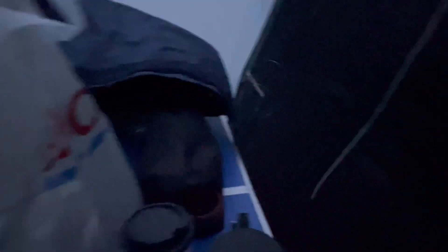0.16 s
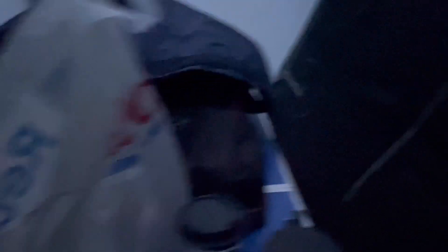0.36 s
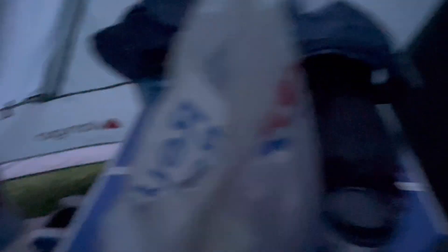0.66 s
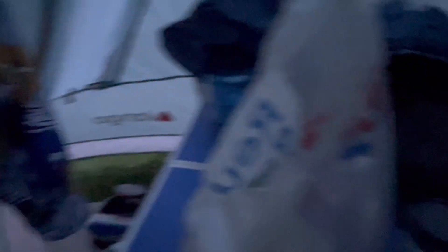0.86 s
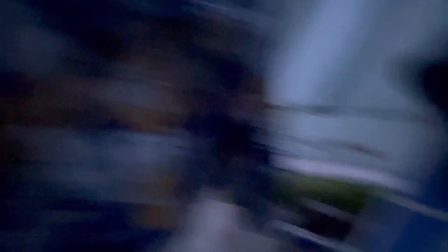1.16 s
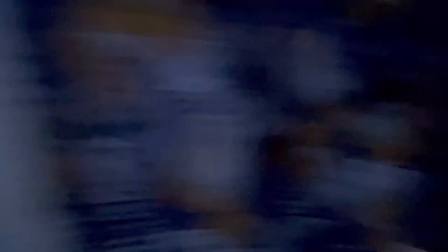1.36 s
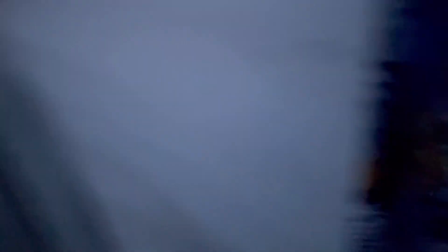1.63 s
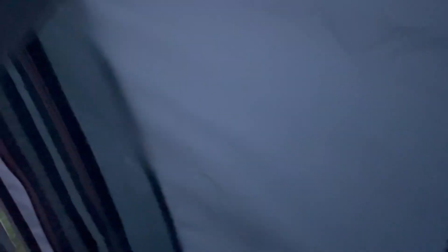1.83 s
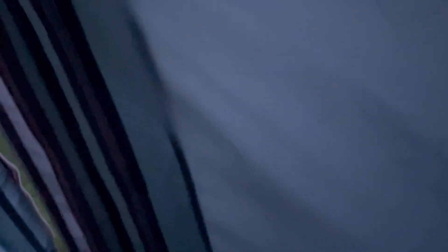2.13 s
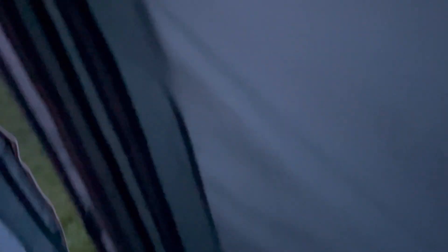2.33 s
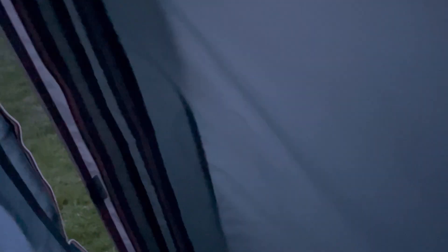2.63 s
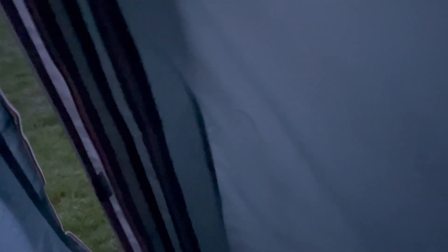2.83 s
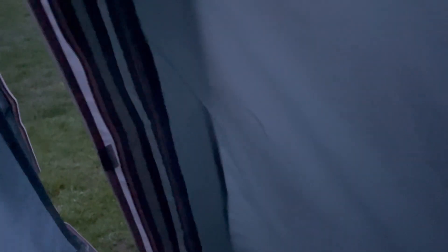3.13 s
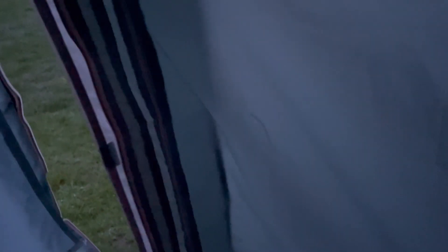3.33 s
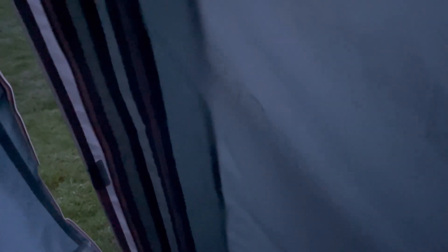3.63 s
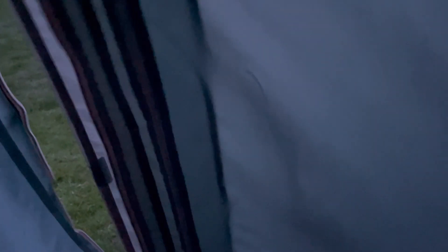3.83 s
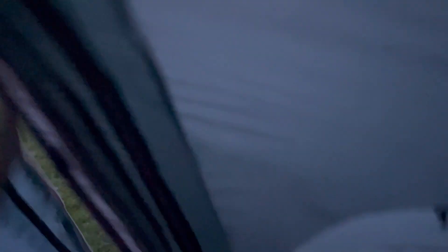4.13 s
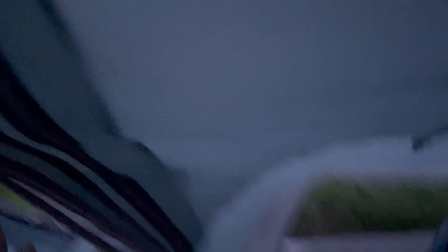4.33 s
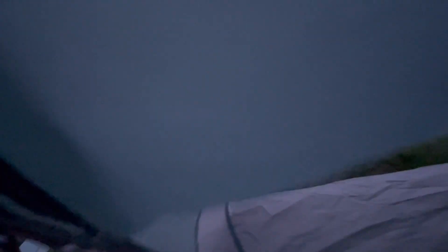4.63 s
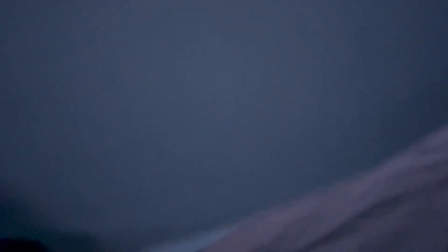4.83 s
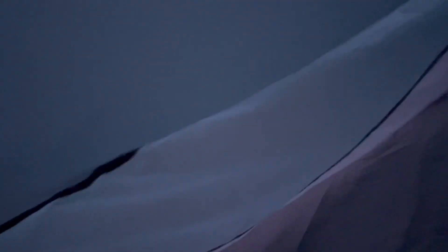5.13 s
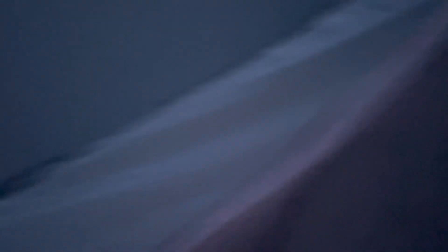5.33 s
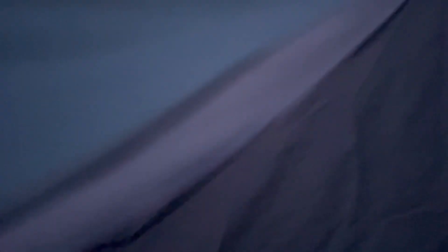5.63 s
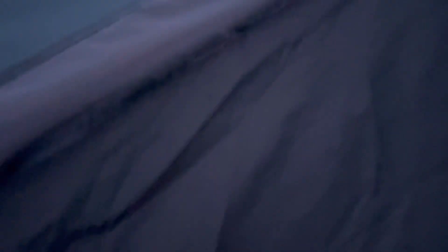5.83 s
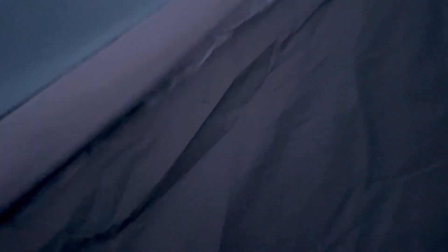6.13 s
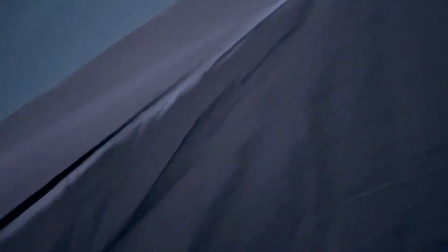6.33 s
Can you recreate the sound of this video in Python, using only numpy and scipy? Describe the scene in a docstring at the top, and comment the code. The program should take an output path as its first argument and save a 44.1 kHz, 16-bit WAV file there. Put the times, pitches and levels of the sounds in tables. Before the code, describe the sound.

Close, dry stereo inside a tent, with faint hand rumble and softly stirring cloth. At about 0.5 s a hard, hollow object lands with a loud double clack, its second blow heavier, then rocks with a weaker knock near 0.6 s. From 0.7 to 3 s nylon slides and rustles quietly with tiny snaps and brushes, settling almost to stillness. At 3.85 s a zip starts, rising quickly from a buzz to a fast rasp until 4.3 s, where the metal tab clinks and the taut panel shudders with a dull snap. A second fast stroke runs 4.36-4.83 s; a third slows into separate ticks by 5.15 s. Shorter, lower strokes follow at 5.25 and 5.55 s, slackening by 5.9 s. Loosened nylon swishes, crackles and thuds around them, with thin husky whistles, a small knock at 6.3 s and a last rising cloth squeak.

```python
"""Inside a tent something hard is set down with a double clack, and nylon rustles in a turn to the door.
The door zip is pulled in five strokes: a pulse per tooth buzzes in the cloth and rasps in the teeth.
The metal tab clinks and the door panel shudders; cloth, in bands of shaped noise, swishes, snaps and billows.
All is heard close to the two microphone ports of a hand-held camera, over the rumble of the hand."""
import sys
import numpy as np
from scipy import signal
from scipy.fft import rfft, irfft, next_fast_len
from scipy.io import wavfile
from scipy.ndimage import uniform_filter1d, map_coordinates

SR = 44100
rng = np.random.default_rng(int(sys.argv[2]) if len(sys.argv) > 2 else 0)


def to_wav(sig):
    """Store sig (one row per channel, or 1-D mono) as 16-bit WAV at the path in sys.argv[1].

    Samples outside -1..1 are clipped; the rate is SR.
    """
    pcm = np.clip(np.atleast_2d(sig), -1, 1) * 32767
    pcm = np.round(pcm).astype(np.int16)
    wavfile.write(sys.argv[1], SR, pcm.T)  # frames by channels


N = 285530  # samples

# five strokes of the hand, a list each: (time [s], slider speed [teeth/s], cloth buzz before gain [dB])
PULLS = [
    [(3.85, 193, -59), (3.866, 234, -34), (3.88, 236.2, -52), (3.884, 266, -39), (3.92, 346, -34),
     (3.93, 390, -28), (3.944, 535, -30.5), (3.95, 536, -31.5), (3.978, 457, -29.5), (3.982, 450, -25),
     (3.988, 486, -42), (4.0, 536, -33), (4.01, 710, -47), (4.018, 830, -42), (4.036, 670, -36.5),
     (4.066, 850, -49), (4.088, 810, -46), (4.094, 870, -52), (4.108, 840, -41), (4.118, 776.8, -44),
     (4.124, 822.7, -61), (4.138, 930, -37), (4.196, 770, -44), (4.216, 810, -44), (4.246, 707.7, -38),
     (4.27, 631.2, -29), (4.286, 557.1, -46), (4.3, 498.5, -40)],
    [(4.36, 397, -47), (4.372, 590, -35), (4.38, 657.5, -36), (4.398, 760, -38.5), (4.41, 633.0, -30),
     (4.414, 646, -28), (4.448, 600, -32), (4.456, 550, -33.5), (4.47, 670, -36.5), (4.484, 536, -32),
     (4.504, 650, -33), (4.526, 640, -37), (4.532, 605, -46), (4.54, 495, -35), (4.552, 530, -49),
     (4.56, 580, -38), (4.58, 484, -37), (4.61, 650, -37.5), (4.624, 670, -54), (4.66, 724, -55),
     (4.694, 610, -55), (4.726, 635, -46), (4.742, 525, -42), (4.766, 466, -46), (4.78, 510, -46),
     (4.8, 422.4, -39), (4.81, 405.8, -38), (4.835, 322.2, -36)],
    [(4.85, 510, -39), (4.865, 520, -48), (4.91, 360, -37), (4.98, 245, -42), (5.03, 265, -43),
     (5.15, 77, -79)],
    [(5.24, 200, -53), (5.28, 268, -44), (5.308, 415, -35.5), (5.345, 317, -36.5), (5.385, 380, -38),
     (5.396, 515, -37.5), (5.43, 502, -34), (5.465, 490, -37.5), (5.485, 440, -52)],
    [(5.55, 357, -48), (5.595, 387, -47.5), (5.615, 420, -39.5), (5.655, 392, -34.5), (5.675, 270, -41),
     (5.7, 475, -31), (5.735, 323, -35), (5.755, 207, -36.5), (5.78, 140, -49), (5.9, 56.5, -46)],
]
# cloth around the slider, response: (frequency [Hz], level [dB])
TAPE_SPECTRUM = [(100, -10.5), (230, 14), (400, 13), (650, 4.5), (950, -4.5), (1400, -9), (2200, -49),
                 (5000, -79)]
# teeth, response before the tilt of each stroke: (frequency [Hz], level [dB])
TEETH_SPECTRUM = [(500, -20), (800, -4), (1200, 5), (1650, 3.5), (2000, -3.5), (2550, 2.5), (3000, -2),
                  (3500, -2.5), (4300, -7), (5200, -9), (5800, -21), (7700, -13), (9000, -21), (11200, -10),
                  (12500, -24), (15500, -30)]
# tilt of the teeth's colour, one value per stroke: [dB/octave]
STROKE_TILTS_DB_PER_OCTAVE = [-1, -4, -7, -1, -5]
# scrape of the teeth: (frequency [Hz], level [dB per Hz])
GRIT_SPECTRUM = [(500, -18), (1200, -6), (2600, -8), (4500, 6), (7000, 3), (12000, -12)]
# how hard the teeth rasp at an easy pace: (time [s], level [dB])
RASP_LEVELS = [(3.85, -43), (3.95, -39.5), (4.03, -38.5), (4.07, -35), (4.16, -36), (4.24, -41.5),
               (4.35, -43), (4.43, -42), (4.49, -39), (4.56, -44), (4.66, -40.5), (4.8, -44), (4.9, -41),
               (5.15, -43), (5.24, -51), (5.48, -51), (5.7, -45)]
# pull tab strikes: (time [s], level [dB])
CLINKS = [(4.3014, -19.5), (4.3065, -17.5), (4.309, -21), (4.329, -22), (4.3317, -23)]
# pull tab colour: (frequency [Hz], level [dB per Hz])
TAB_SPECTRUM = [(1500, -22), (3000, 1), (4200, 6.5), (8000, 7.5), (11000, 6), (14000, -32)]
# shudder of the taut door panel: (time [s], fundamental [Hz], level [dB])
SHUDDER = [(4.2, 116.9, -64), (4.235, 113.8, -36), (4.27, 117.5, -32.5), (4.31, 114.3, -38.5),
           (4.34, 97.44, -35.5), (4.36, 80.1, -59)]
# nylon slides in the turn to the door, as it opens and as it falls aside, a list each:
# (time [s], swish before gain [dB], rustle before gain [dB])
SLIDES = [
    [(1.25, -76.5, -61), (1.42, -66, -56), (1.43, -55, -51), (1.55, -52.5, -51), (1.68, -64.5, -52.5),
     (2.06, -50, -52), (2.71, -65, -55), (3.01, -67.5, -61.5), (3.63, -75, -69)],
    [(3.72, -62, -63), (3.872, -55, -52), (3.946, -47, -42), (4.134, -43, -37.5), (4.288, -46, -40),
     (4.298, -47.5, -38.5), (4.5, -47.5, -48.5), (4.684, -44.5, -37), (4.79, -52, -49)],
    [(4.82, -36.5, -46), (4.828, -39, -40), (5.136, -42.5, -42.5), (5.33, -37, -46), (5.684, -40.5, -41.5),
     (5.77, -39, -36), (5.932, -50, -44), (6.166, -47.5, -50), (6.47, -42.5, -57)],
]
# a sleeve or the door brushes past: (time [s], Gaussian width [s], swish [dB], rustle [dB])
BRUSHES = [(.05, .05, -68, -84), (1.081, 0.022, -62, -50), (1.487, 0.0074, -42.5, -56),
           (2.306, 0.018, -43.5, -61), (2.433, 0.013, -61, -68), (2.565, 0.027, -52, -51),
           (3.405, 0.018, -58.5, -55), (3.681, 0.0099, -53, -73), (4.343, 0.0091, -41, -29.5),
           (4.866, 0.019, -34.5, -37), (5.333, 0.038, -39.5, -36), (5.977, 0.025, -56, -41)]
# bright slide of nylon: (frequency [Hz], level [dB per Hz])
SWISH_SPECTRUM = [(4000, -8.5), (7000, -3), (9000, -2), (11000, 1), (13000, -0.5), (14500, -3.5),
                  (16000, -7.5)]
# folds and creases: (frequency [Hz], level [dB per Hz])
RUSTLE_SPECTRUM = [(300, -22), (900, 7), (1600, 1.5), (3000, 1.5), (4800, -3), (5600, -8), (7000, -7),
                   (9000, -14.5), (15000, -35)]
# singing weave, a list per passage: (time [s], pitch [Hz], level before gain [dB])
WHISTLES = [
    [(2.35, 3000, -57), (2.45, 2700, -61), (2.58, 3050, -61), (2.65, 2750, -60), (2.76, 2700, -63),
     (2.9, 3300, -63)],
    [(5.37, 3250, -51), (5.47, 3080, -45), (5.55, 2900, -53), (5.61, 2740, -43), (5.68, 2700, -45)],
    [(6.31, 2420, -61), (6.343, 2780, -52), (6.37, 3080, -48), (6.412, 3630, -50.5), (6.445, 3830, -53),
     (6.47, 3920, -43)],
]
# small snaps, slow last ticks of the zip and a late knock:
# (time [s], pop [dB], thud [dB], crackle [dB]), all before gain
SNAPS = [(0.162, -47, -62, -48), (0.207, -47, -65, -52), (0.333, -50, -65, -62), (0.744, -41, -38, -53),
         (0.881, -46, -59, -62), (0.914, -46, -45, -41.5), (1.189, -39, -53, -49), (1.379, -43.5, -55, -48),
         (1.431, -44, -35, -40), (1.493, -42, -45, -41), (1.536, -46, -32.5, -42), (1.603, -49, -28.5, -49),
         (1.625, -46, -36, -54), (1.643, -40, -50, -44), (1.898, -39.5, -43, -39), (2.12, -53, -55, -45),
         (2.284, -65, -34.5, -56), (2.449, -42, -45, -58), (2.767, -60, -42, -60), (2.861, -47, -53, -49),
         (3.025, -52, -58, -46), (3.727, -51, -27.5, -53), (4.304, -36, -19, -50), (4.331, -38, -27, -42),
         (4.605, -44, -45, -38), (5.003, -20.5, -40, -28), (5.19, -33, -46, -37), (5.222, -33.5, -45, -42),
         (5.296, -32, -31, -51), (5.347, -32, -42, -37), (5.723, -48, -34, -29.5), (5.767, -44, -20.5, -31),
         (5.784, -34, -21, -34), (5.809, -36, -22, -43), (5.828, -44, -35, -37), (5.845, -34, -27, -35),
         (5.893, -52, -29, -42), (5.956, -38, -29, -29), (5.976, -40, -36, -33), (6.002, -47, -22.5, -31.5),
         (6.212, -36, -58, -49), (6.292, -43, -25, -49)]
# short dull scuffs in the cloth, and one brief knock near the end:
# (time [s], Gaussian width [s], level [dB])
SCUFFS = [(2.315, .022, -49), (5.005, 0.006, -28), (5.206, 0.019, -33), (5.308, 0.012, -35),
          (5.342, 0.016, -33), (5.969, 0.02, -38), (6.295, .002, -28)]
# scuff colour: (frequency [Hz], level [dB per Hz])
SCUFF_SPECTRUM = [(200, 8), (500, 4.5), (850, 6.5), (1150, 11), (1450, -0.5), (1900, -1), (2800, -8),
                  (5000, -19), (10000, -23)]
# the hard thing lands and rocks: (time [s], ring peak [dB], ring tilt [dB/octave],
# thud before gain [dB], knock [dB], crack [dB], t60 of knock and crack [s])
CLACKS = [(0.4776, -9.5, 1.5, -15, -21, -13, 0.068), (0.5001, -5.5, -2, -19, -15.5, -19.5, 0.079),
          (0.5076, -17.5, -0.5, -19, -32, -32, 0.014), (0.5843, -19, -7, -22.5, -25, -43.5, 0.034),
          (0.6157, -48, -10, -57, -39, -70, 0.033)]
# modes of its hollow case: (frequency [Hz], relative level before tilt [dB], t60 [s])
CASE_MODES = [(126, -11, 0.059), (293.5, -4, 0.088), (341.8, -9.5, 0.25), (448, -16, 0.08),
              (560, -6.5, 0.047), (625, -7, 0.065), (807, -2, 0.069), (1023, 2.5, 0.031),
              (1250, -15, 0.052), (1362, -14, 0.1), (1562, -7, 0.057), (1657, -0.5, 0.048),
              (2000, -10, 0.03), (2226, -2, 0.039), (2420, -7, 0.035), (2570, -6, 0.04), (2750, -11, 0.05),
              (3014, -9, 0.033), (3300, -9, 0.032), (3500, -2, 0.037), (4520, -13, 0.051),
              (4930, -16, .035), (5340, -17, 0.04), (6450, -11, 0.045)]
# tent walls: (frequency [Hz], level [dB per Hz])
BILLOW_SPECTRUM = [(90, -21), (180, 2.5), (280, -0.5), (450, -3.5), (800, -9), (1300, -12), (3000, -35.5)]
# hand on the camera: (frequency [Hz], level [dB per Hz])
RUMBLE_SPECTRUM = [(20, -42), (35, -5), (52, 7), (80, 4), (130, 1.5), (190, -10.5), (400, -44)]
# the hand shifts on the camera: (time [s], Gaussian width [s], level [dB])
BUMPS = [(1.042, 0.043, -46.5), (1.532, 0.079, -40), (1.966, .03, -44), (4.322, 0.14, -50),
         (4.869, 0.019, -33.5), (5.421, 0.03, -41), (5.82, 0.044, -40.5), (6.012, 0.032, -40),
         (6.216, 0.11, -44.5)]
# left-right correlation of diffuse noise: (frequency [Hz], likeness [-1 to 1, clipped])
LIKENESS = [(60, 0.89), (200, 0.96), (400, 0.79), (700, 0.22), (1400, 0.18), (3000, 0.23), (5000, 0.37),
            (7000, -0.42), (8400, -1.05), (10000, -0.43), (11500, -0.036), (12800, 0.99), (13600, 0.93)]

EASY_TEETH_PER_S, RASP_DB_PER_OCTAVE = 500, 14  # the rasp fades as the slider falls below that pace
JUDDER_PER_S, JUDDER_SHARE = 130, .013  # unsteady slider speed
ROW_OFFSET_TEETH = .012  # the two rows interlock a little off centre
CATCH_DB, CHATTER_DB = 1.5, 2  # the tape catches and lets go; the teeth chatter
GRIT_DB = -13  # scrape re the teeth
SWISH_GAIN_DB, RUSTLE_GAIN_DB = 2.5, 1
STILL_SWISH_DB, STILL_RUSTLE_DB = -80, -63.5  # the tent at rest
TAUT_RUSTLE_DB, TAUT_BILLOW_DB = -7, -1  # a door held taut rustles and billows less
CRINKLES_PER_S, CRINKLE_DB = 20, 0  # small creases give way; mean level re the rustle
RUMBLE_DB, RUMBLE_SHARE_DB = -52, -8.5  # at rest; re the rustle strength when the cloth moves
BILLOW_DB, BILLOW_SHARE_DB = -53, -2.5  # likewise
STIR_DB_PER_S = 0.94  # the walls stir more and more until the zip is pulled
TOP_HZ = 15830


def amp(db):
    """Amplitude of a level in dB."""
    return 10 ** (np.asarray(db) / 20)


def unit(x):
    """x at rms 1."""
    return x / np.sqrt(np.mean(x ** 2) + 1e-20)


def along(points, hz):
    """(Hz, value) points interpolated on a log axis."""
    f, v = np.transpose(points)
    return np.interp(np.log(hz + 1), np.log(f + 1), v)


def curves(rows):
    """One value per sample for each column after the time."""
    s, *cols = np.transpose(rows)
    return [np.interp(np.arange(N) / SR, s, c) for c in cols]


def during(rows):
    """1 while a table lasts, else 0, with 9 ms edges."""
    t = np.arange(N) / SR
    inside = (t > rows[0][0]) & (t < rows[-1][0])
    return uniform_filter1d(1. * inside, size=400)


def wobble(rate):
    """Smooth random curve, rate knots per second."""
    knots = rng.standard_normal(int(N * rate / SR) + 4)
    return map_coordinates(knots, [np.arange(N) * rate / SR])


def filtered(x, response):
    """x times a complex response of frequency."""
    m = next_fast_len(N + SR // 2)
    return irfft(rfft(x, m) * response(np.fft.rfftfreq(m, 1 / SR)), m)[..., :N]


def coloured(x, spectrum):
    """x through a (Hz, dB) spectrum, at rms 1."""
    return unit(filtered(x, lambda hz: amp(along(spectrum, hz))))


def levelled(x):
    """x held near rms 1 from moment to moment."""
    power = uniform_filter1d(uniform_filter1d(x ** 2, size=600), size=600)
    return x / np.sqrt(np.abs(power) + 1e-9)


def rush(spectrum, grain_db=0):
    """Stereo noise of rms 1, optionally clumped into millisecond grains, correlated as LIKENESS."""
    pair = rng.standard_normal((2, N)) * amp(grain_db * wobble(700))

    def mid_side(hz):
        """Mid and side responses that set the likeness."""
        turn = np.arccos(np.clip(along(LIKENESS, hz), -1, 1)) / 2
        return amp(along(spectrum, hz)) * [np.cos(turn), np.sin(turn)]

    mid, side = filtered(pair, mid_side)
    return unit(np.array([mid + side, mid - side]))


def blows(times, levels_db, t60, attack):
    """Envelope that jumps at each time and dies away."""
    out, t = np.zeros(N + SR), np.arange(SR // 3) / SR
    for s, db, life in zip(times, levels_db, t60 * np.ones(len(times))):
        out[round(s * SR):][:len(t)] += amp(db - 60 * t / life) * (1 - np.exp(-t / attack))
    return out[:N]


def swells(times, widths, levels_db):
    """Envelope that swells and fades around each time."""
    t = np.arange(N) / SR
    return sum(amp(db) * np.exp(-((t - s) / width) ** 2 / 2)
               for s, width, db in zip(times, widths, levels_db))


def in_tent(x, lead, echo_db, t60):
    """Left port hears x lead seconds before the right; the cloth walls add a short diffuse answer."""
    t = np.arange(SR // 8) / SR
    tail = rng.standard_normal((2, len(t))) * amp(-60 * t / t60) * (t > .002)
    echo = signal.fftconvolve(x[None], tail / np.linalg.norm(tail[0]), axes=1)[:, :N]
    sides = np.array([[1], [-1]])
    direct = filtered(x, lambda hz: np.exp(1j * np.pi * hz * lead * sides))
    return direct + amp(echo_db) * echo


def zipper(rate):
    """Teeth snap through the slider: cloth buzzes at their rate, teeth rasp and scrape, softer when slow."""
    strokes = np.vstack(PULLS)
    buzz_db = curves(strokes)[1]
    rasp_db, = curves(RASP_LEVELS)
    octaves_slow = np.minimum(np.log2(rate / EASY_TEETH_PER_S), 0)
    ticks = tooth_ticks(rate, scatter=.009, size_db=1.1)

    buzz = amp(buzz_db + 1 + CATCH_DB * wobble(110)) * levelled(coloured(ticks, TAPE_SPECTRUM))

    teeth = 0
    for pull, tilt in zip(PULLS, STROKE_TILTS_DB_PER_OCTAVE):
        tilted = [(hz, db + tilt * np.log2(hz)) for hz, db in TEETH_SPECTRUM]
        teeth = teeth + during(pull) * coloured(ticks, tilted)
    teeth = np.std(teeth) * patchy(teeth, depth_db=3.2)
    grit = coloured(uniform_filter1d(ticks, size=14) * rng.standard_normal(N), GRIT_SPECTRUM)
    strength = amp(rasp_db + RASP_DB_PER_OCTAVE * octaves_slow + CHATTER_DB * wobble(50))
    rasp = strength * (teeth + amp(GRIT_DB) * grit)

    # the broad panel is heard from further ahead than the slider, which is off to the left
    panel_side = in_tent(buzz, lead=.00027, echo_db=-15, t60=.03)
    slider_side = in_tent(rasp, lead=.00038, echo_db=-9, t60=.015) * amp([[1.5], [-1.5]])
    return (panel_side + slider_side) * during(strokes) * amp([[.7], [-.7]])


def tooth_ticks(rate, scatter, size_db):
    """One pulse per tooth, a little uneven in spacing and size, at constant power."""
    turns = np.cumsum(rate) / SR
    teeth = np.arange(1, int(turns[-1]))
    chance = rng.standard_normal((len(teeth), 2))
    places = teeth + ROW_OFFSET_TEETH * (-1) ** teeth + scatter * chance[:, 0]
    at = np.interp(places, turns, np.arange(N))
    size = amp(size_db * chance[:, 1]) / np.sqrt(rate[at.astype(int)])
    # windowed sinc places each pulse between samples
    taps = at.astype(int)[:, None] + np.arange(-7, 9)
    offset = taps - at[:, None]
    pulses = size[:, None] * np.sinc(offset) * np.sinc(offset / 8)
    return np.bincount(np.clip(taps, 0, N - 1).ravel(), pulses.ravel(), N)


def patchy(x, depth_db):
    """x with its partials flickering independently, over some 500 Hz and 25 ms, at rms 1."""
    z = signal.stft(x, nperseg=512)[2]
    field = uniform_filter1d(rng.standard_normal(z.shape), size=6, axis=0)
    field = uniform_filter1d(field, size=4, axis=1)
    return unit(signal.istft(z * amp(depth_db * unit(field)), nperseg=512)[1][:N])


def tab():
    """The metal tab rattles against the slider as the first stroke ends: brief bright bursts."""
    s, db = np.transpose(CLINKS)
    return blows(s, db, t60=0.01, attack=0.000098) * rush(TAB_SPECTRUM)


def panel():
    """The door panel shudders as the first stroke stretches it: unsteady fundamental plus octave."""
    hz, db = curves(SHUDDER)
    phase = 2 * np.pi * np.cumsum(hz * np.exp(0.02946 * wobble(90.3))) / SR
    return amp(db) * during(SHUDDER) * (np.sin(phase) + np.sin(2 * phase))


def cloth(rate, swishing, rustling):
    """Nylon slides on nylon with a bright swish over a grainy rustle."""
    s, width, swish_db, rustle_db = np.transpose(BRUSHES)
    swishing = np.hypot(swishing + amp(STILL_SWISH_DB), swells(s, width, swish_db))
    rustling = np.hypot(np.hypot(rustling, amp(STILL_RUSTLE_DB)), swells(s, width, rustle_db))
    swish = swishing * amp(1.45 * wobble(35)) * rush(SWISH_SPECTRUM, grain_db=1.0)

    # sparse creases, 160 per s on average
    creases = rng.standard_normal(N) * (rng.random(N) < 160 / SR) * amp(2.4 * rng.standard_normal(N))
    rubbing = rng.standard_normal(N) * amp(4.9 * wobble(700)) + amp(-1.5) * unit(creases)
    folds = off_wall(coloured(rubbing, RUSTLE_SPECTRUM), gap=.0016, sway=.2, share=.55)
    near = in_tent(folds, lead=0.000442, echo_db=-7.5, t60=0.026)
    rustle = unit(near + amp(3.0) * rush(RUSTLE_SPECTRUM, grain_db=0))

    # during the strokes the taut cloth rubs mostly in a jerk at each tooth
    tooth_phase = 2 * np.pi * np.cumsum(rate) / SR
    jerk_db = during(np.vstack(PULLS)) * (TAUT_RUSTLE_DB + 6 * np.cos(tooth_phase))
    return swish + rustling * crinkles() * amp(jerk_db + 1.68 * wobble(40)) * rustle


def sliding():
    """Strength of the swish and of the rustle while the nylon is on the move."""
    rows = np.vstack(SLIDES)
    swish_db, rustle_db = curves(rows)
    return amp([swish_db + SWISH_GAIN_DB, rustle_db + RUSTLE_GAIN_DB]) * during(rows)


def crinkles():
    """Gain of the rustle: jumps briefly whenever a small crease gives way."""
    chance = rng.random((int(CRINKLES_PER_S * N / SR), 2))
    times = chance[:, 0] * N / SR
    return 1 + blows(times, CRINKLE_DB + 8 * (chance[:, 1] - .5), t60=0.011, attack=0.00056)


def off_wall(x, gap, sway, share):
    """x plus its echo from a swaying wall, about gap seconds late: comb bands drift; rms 1."""
    late = SR * gap * np.exp(sway * wobble(3))
    return unit(x + share * np.interp(np.arange(N) - late, np.arange(N), x))


def snaps():
    """Small snaps, slow last ticks of the zip and a late knock: each a soft thud, a pop and a crackle."""
    s, pop_db, thud_db, crackle_db = np.transpose(SNAPS)
    thud = blows(s, thud_db + 1.0, t60=0.031, attack=0.0019) * rush(
        [(70, -39), (200, -2.0), (450, 0.5), (900, -22.5), (2000, -34)])
    pop = blows(s, pop_db + 1.0, t60=0.034, attack=0.00057) * rush(
        [(400, -12), (900, -0.5), (2000, -5.0), (3500, -20.0), (8000, -45)])
    crackle = blows(s, crackle_db + 0.5, t60=0.035, attack=0.0013) * rush(
        [(1400, 5), (2700, 20.0), (5000, 10.0), (12000, -15)])
    return thud + pop + crackle


def scuffs():
    """Short dull scuffs in the cloth, and one brief knock near the end: swells of uneven, grainy noise."""
    grain = unit(amp(2.8 * wobble(260)) * rush(SCUFF_SPECTRUM, grain_db=3))
    return swells(*np.transpose(SCUFFS)) * grain


def whistle():
    """Ribs of the weave sing thin, husky, gliding notes as nylon slides over nylon."""
    hz, db = curves(np.vstack(WHISTLES))
    husk = .6 + wobble(330) + 1j * wobble(330)  # random amplitude and phase
    phase = 2 * np.pi * np.cumsum(hz * np.exp(.025 * wobble(900))) / SR
    tone = unit(np.real(husk * np.exp(1j * phase)))
    sounding = sum(during(note) for note in WHISTLES)
    return in_tent(amp(db - 2.5) * sounding * tone, lead=.00005, echo_db=-3.5, t60=0.047)


def clacks():
    """One edge lands with a crack, the other with a heavier knock, then the thing rocks to rest."""
    s, ring_db, tilt_db, thud_db, knock_db, crack_db, life = np.transpose(CLACKS)
    ring = struck(CASE_MODES, s, ring_db, tilt_db)
    thud = blows(s, thud_db - 11.5, t60=0.16, attack=0.00081) * rush(
        [(70, -2.5), (150, 3), (250, 1.0), (400, 5.5), (700, -2.0), (1500, -53.0)])
    knock = blows(s, knock_db, life, attack=0.00014) * rush(
        [(250, -27), (600, 0.0), (900, 6.0), (1400, 0.0), (2000, -14), (3500, -30), (8000, -49)])
    crack = blows(s, crack_db, life, attack=0.00013) * rush(
        [(1000, -23), (1900, 3.5), (3600, -0.5), (5000, -2.5), (7000, -4.0), (9000, -11.5),
         (13000, -14.5), (16000, -32)])
    return in_tent(ring, lead=.00003, echo_db=-21, t60=0.2) + thud + knock + crack


def struck(modes, times, levels_db, tilts_db):
    """Each blow rings the modes at slightly new strengths; harder contact favours the high ones."""
    out, t = np.zeros(N + SR), np.arange(SR // 3) / SR
    for s, db, tilt in zip(times, levels_db, tilts_db):
        ring = np.zeros(len(t))
        for k, (hz, level, t60) in enumerate(modes):
            mode_db = level + tilt * np.log2(hz) + rng.normal(0, 1.8) - 60 * t / t60
            ring += amp(mode_db) * np.sin(2 * np.pi * hz * t) * (-1) ** k  # alternating sign
        out[round(s * SR):][:len(t)] += amp(db) * ring / np.abs(ring).max()
    return out[:N]


def handling(rustling):
    """The walls billow and the hand rumbles on the camera, both more when the cloth moves."""
    shaking = np.hypot(amp(RUMBLE_DB), amp(RUMBLE_SHARE_DB) * rustling)
    shaking = np.hypot(shaking, swells(*np.transpose(BUMPS)))
    rumble = shaking * amp(1.95 * wobble(14)) * rush(RUMBLE_SPECTRUM)

    stir_db = STIR_DB_PER_S * np.minimum(np.arange(N) / SR, PULLS[0][0][0])
    swaying = np.hypot(amp(BILLOW_DB + stir_db), amp(BILLOW_SHARE_DB) * rustling)
    taut_db = TAUT_BILLOW_DB * during(np.vstack(PULLS))
    billow = swaying * amp(taut_db + 2.0 * wobble(30)) * rush(BILLOW_SPECTRUM, grain_db=0.5)
    return (rumble + billow) * amp([[.6], [-.6]])


def scene():
    """The slider's juddering speed and the sliding of the nylon drive the sources."""
    judder = JUDDER_SHARE * wobble(JUDDER_PER_S) + .008 * wobble(260)
    rate = curves(np.vstack(PULLS))[0] * np.exp(judder)
    swishing, rustling = sliding()
    door = zipper(rate) + tab() + panel()
    nylon = cloth(rate, swishing, rustling) + snaps() + scuffs() + whistle()
    return door + nylon + clacks() + handling(rustling)


def record(dry):
    """The camera rounds off the highest peaks and keeps nothing above its band limit."""
    held = dry / (1 + np.abs(dry / .95) ** 6) ** (1 / 6)
    return filtered(held, lambda hz: hz < TOP_HZ)


dry = scene()
out = record(dry)
to_wav(out)
```